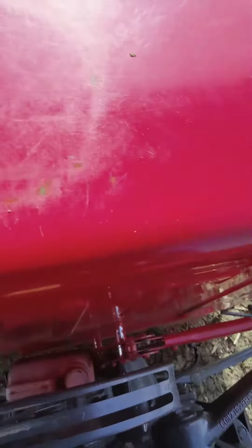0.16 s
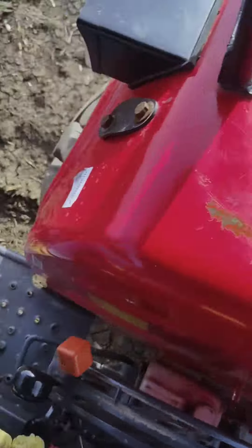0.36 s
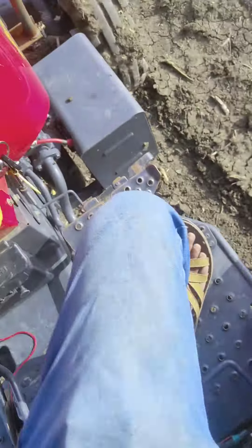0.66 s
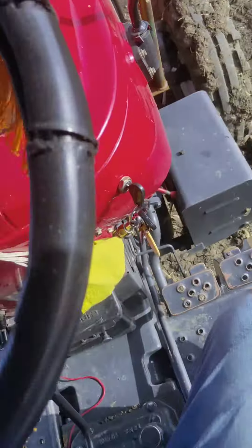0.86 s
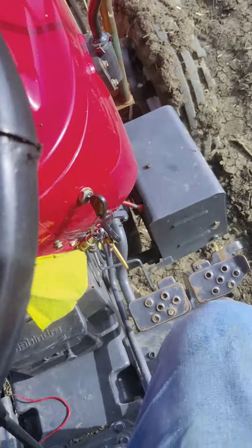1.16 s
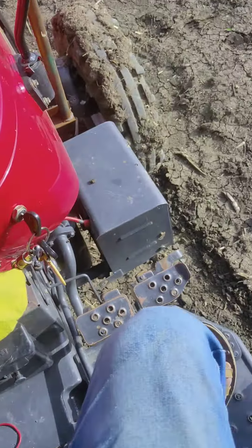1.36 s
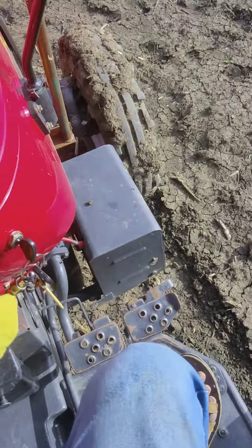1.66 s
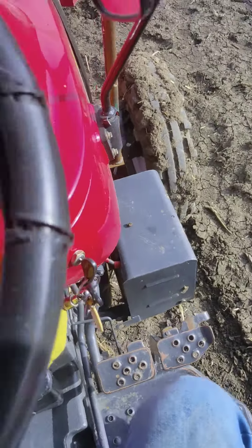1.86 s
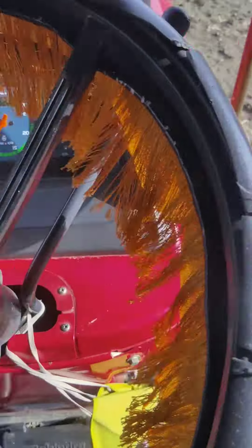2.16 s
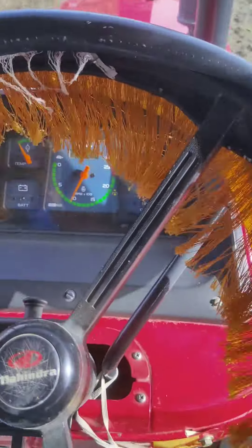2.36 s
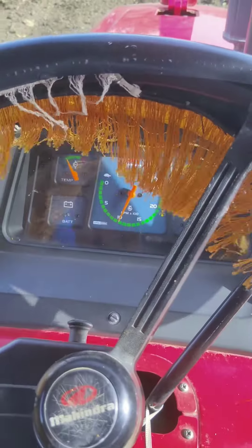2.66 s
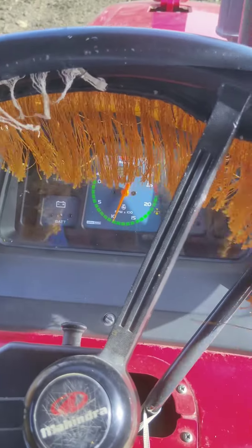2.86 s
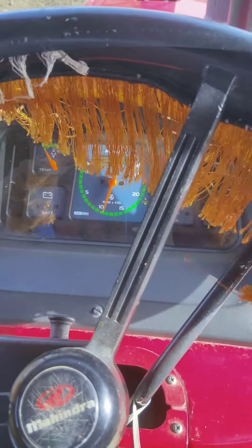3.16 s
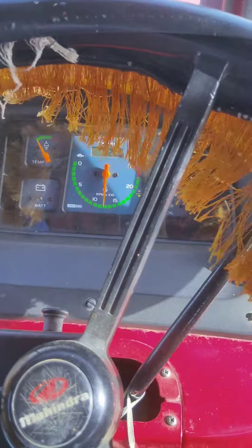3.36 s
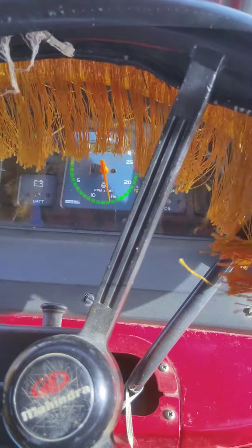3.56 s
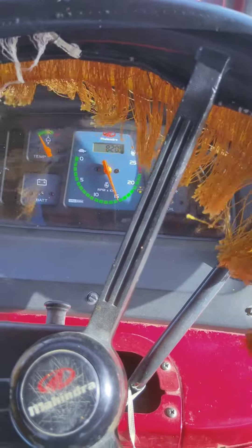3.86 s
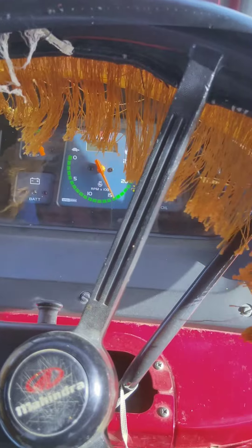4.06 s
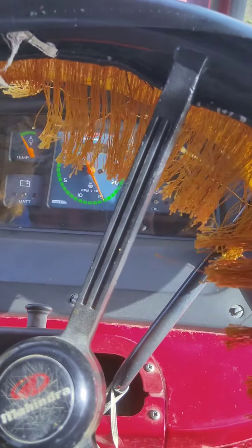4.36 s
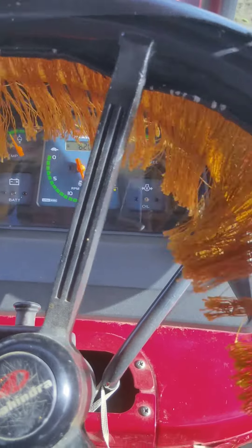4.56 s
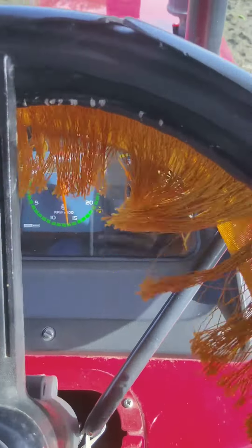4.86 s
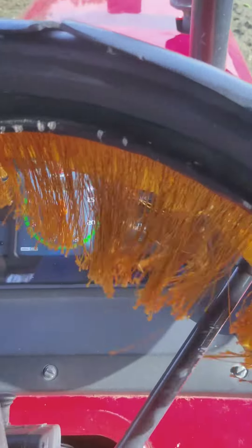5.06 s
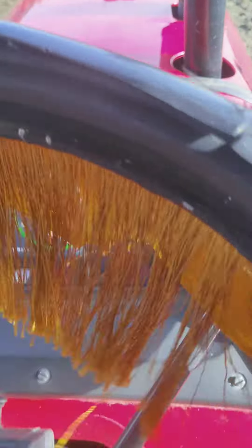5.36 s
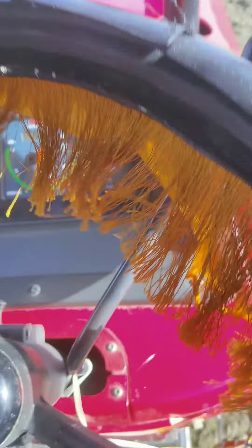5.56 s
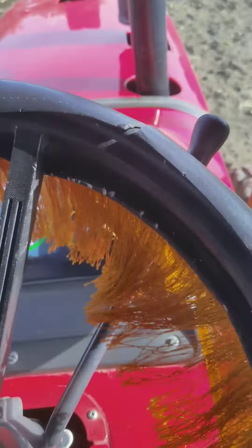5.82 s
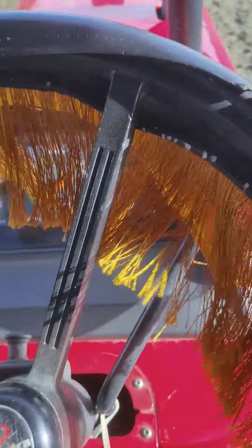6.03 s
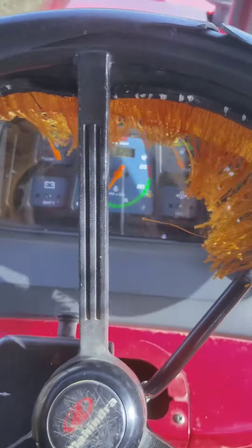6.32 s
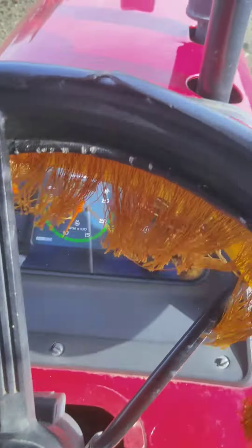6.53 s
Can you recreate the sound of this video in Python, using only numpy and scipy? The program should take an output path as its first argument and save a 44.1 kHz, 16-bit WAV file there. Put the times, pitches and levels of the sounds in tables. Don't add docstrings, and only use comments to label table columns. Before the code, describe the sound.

A four-cylinder diesel tractor idles with lumpy knocking, pulls away, revs to a loud hum, drops back, then labours with a gear whine.

```python
import sys
import numpy as np
from scipy import signal
from scipy.fft import rfft, irfft, next_fast_len
from scipy.io import wavfile
from scipy.ndimage import uniform_filter1d

SR = 44100
rng = np.random.default_rng(int(sys.argv[2]) if len(sys.argv) > 2 else 0)


def output_pcm(signal):
    pcm = np.clip(np.atleast_2d(signal).T, -1, 1) * 32767
    wavfile.write(sys.argv[1], SR, np.round(pcm).astype(np.int16))


def magnitude_from_level(level_db):
    exponent = np.asarray(level_db, float) / 20
    return 10 ** exponent


N = 295029

CYLINDERS = [1.5, 0.09, 2.1, 0]
# begins, done (time [s])
TURN_S = (2.05, 2.35)


def rms_one(x):
    return x / np.sqrt(np.mean(x ** 2) + 1e-20)


def ramp(times, values):
    return np.interp(np.arange(N) / SR, times, values)


def in_time(rows):
    return ramp(*np.transpose(rows))


def at_hz(points, hz):
    table_hz, values = np.transpose(points)
    return np.interp(np.log(hz), np.log(table_hz), values)


def swell(middle, half):
    return np.cos(np.pi / 2 * ramp([middle - half, middle + half], [-1, 1])) ** 2


def drift(rate):
    r = np.exp(-80 * np.pi * rate / SR)
    noise = rng.standard_normal(N // 40 + 2002)
    slow = signal.lfilter([1], [1, -2 * r, r * r], noise)[2000:]
    return np.interp(np.arange(N) / 40, np.arange(len(slow)), rms_one(slow))


def ring(impulses, hz, t60):
    r, w = magnitude_from_level(-60 / (t60 * SR)), 2 * np.pi * hz / SR
    return signal.lfilter([0, np.sin(w)], [1, -2 * r * np.cos(w), r * r], impulses + 1e-18)


def fade(x, seconds):
    r = np.exp(-1 / (seconds * SR))
    return signal.lfilter([1 - r], [1, -r], x)


def even(power):
    return np.sqrt(power / uniform_filter1d(power, size=SR // 6))


def band(spectrum, low_hz, high_hz):
    def gain(hz):
        edges = (1 + (low_hz / hz) ** 10) * (1 + (hz / high_hz) ** 10)
        return magnitude_from_level(at_hz(spectrum, hz)) / np.sqrt(edges)
    return gain


def ports(layers):
    # (frequency [Hz], share heard alike [0-1])
    likeness = [(50, 1), (120, 0.6), (240, 0.99), (500, 0.36), (1000, 0.36), (2000, 0.24), (4000, 0.11),
                (8000, 0.13)]
    lag_samples, lag_from_hz = 19, 950
    size = next_fast_len(N + 4096)
    hz = np.maximum(np.arange(size // 2 + 1) * SR / size, 1)
    alike = np.clip(at_hz(likeness, hz), 0, 1)
    late = np.exp(-2j * np.pi * hz * lag_samples / SR * (hz > lag_from_hz))
    arrival = np.array([late, np.ones_like(late)])
    out = 0
    for gate, gain in layers:
        shared, *own = rfft(gate * rng.standard_normal((3, N)), size)
        both = np.sqrt(alike) * shared * arrival + np.sqrt(1 - alike) * np.array(own)
        out = out + rms_one(gain(hz)) * both
    return irfft(out, size)[:, :N]


def firings(turn, spread_db, late=0.0):
    count = np.floor(turn - late).astype(int)
    at = np.flatnonzero(np.diff(count)) + 1
    chance_db = spread_db * rng.standard_normal(400)[count[at]]
    impulses = np.zeros(N)
    impulses[at] = magnitude_from_level(np.array(CYLINDERS)[count[at] % 4] + chance_db)
    return impulses


def knock(turn, spread_db, rise, fall):
    draws = rng.standard_normal((400, 2))
    count = np.floor(turn).astype(int)
    angle = np.clip(turn - count - .04 - .025 * draws[count, 0], 0, 1)
    size = magnitude_from_level(2 * (.25 * np.array(CYLINDERS)[count % 4] + spread_db * draws[count, 1]))
    pulse = size * (1 - np.exp(-(angle / rise) ** 2)) * np.exp(-(angle / fall) ** 1.19)
    return fade(pulse, .0013) / np.mean(pulse)


def exhaust(turn, rate, lugging):
    # (time [s], level [dB])
    blast = [(0.0, -54.9), (0.85, -52.4), (1.08, -38.5), (1.26, -48.7), (1.4, -38.3), (2.3, -33.5),
             (3.0, -31.9), (3.3, -22.9), (4.05, -24.7), (4.085, -38.6), (4.2, -27.6), (4.6, -38.1),
             (4.84, -36.6), (4.865, -27.0), (5.2, -27.6), (5.55, -37.2), (5.85, -31.1), (6.69, -29.2)]
    # (frequency [Hz], level [dB])
    pipe = [(40, -10.8), (70, 4.1), (90, 9.7), (108, 13.8), (135, 2.8), (160, 0.5), (200, -6.0),
            (330, -11.9)]
    # (multiple of the firing rate, running free [dB], lugging [dB])
    orders = [(2, -5.9, -3.8), (3, -1.6, -3.4), (4, 3.5, -8.5), (5, 0.5, 8.6), (6, 4.5, 8.4)]
    blast_db = in_time(blast)
    levels = []
    for k, free_db, lug_db in orders:
        shape_db = free_db + (lug_db - free_db) * lugging
        levels.append(blast_db + at_hz(pipe, k * rate) + shape_db)
    fundamental_db = np.maximum(levels[0] - 1.0, levels[1]) - 22
    apart = np.array([[.15], [-.15]])
    note = 0
    for k, level_db in enumerate([fundamental_db] + levels, 1):
        phase = 2 * np.pi * k * (turn - .1) + .5 * k * k + .035 * k * drift(7) + apart
        note = note + np.sqrt(2) * magnitude_from_level(level_db + .4 * drift(6)) * np.cos(phase)
    return note


def evened(x):
    return x / np.sqrt(uniform_filter1d(x ** 2, size=SR // 5) + 1e-9)


def rumble(turn, low_db, high_db, steady_db):
    # (frequency [Hz], level [dB per Hz])
    rumble_colour = [(15, -71), (25, -43.5), (70, -18.5), (81, -13.5), (108, -5), (162, -3.5), (195, -6),
                     (247, -4), (323, -8), (358, -8), (431, -7.5), (690, -9.5), (904, -15.5), (1120, -18.5),
                     (1400, -33), (1820, -67.5), (3080, -120)]
    # (frequency [Hz], level [dB], t60 [s])
    panels = [(158, -4.5, 0.045), (245, -10, 0.099), (317.8, 2, 0.2), (353.7, 3, 0.17), (386.1, -0.5, 0.22),
              (486.3, 1, 0.22), (550, -6, 0.35), (606.8, 7, 0.14), (716, -9, 0.038), (839, 0.5, 0.099),
              (1075, -12, .08)]
    jolts = .55 * (rng.random((2, N)) < 60 / SR) * rng.standard_normal((2, N))
    struck = []
    for k, (hz, db, t60) in enumerate(panels):
        blows = firings(turn, 2.5, late=1.03 * k) + jolts[k % 2]
        struck.append(magnitude_from_level(db) * ring(blows, hz, t60) * (-1) ** k)
    sides = magnitude_from_level(3.45 * np.array([[-1], [1]]) * (-1) ** np.arange(len(panels)))
    low = magnitude_from_level(low_db - 5) * evened(sides[:, :5] @ struck[:5])
    high = magnitude_from_level(high_db - 4.5) * evened(sides[:, 5:] @ struck[5:])
    no_bass = signal.butter(3, 110, "high", fs=SR, output="sos")
    radiated = magnitude_from_level(1.5) * signal.sosfilt(no_bass, low + high)
    throb = even(knock(turn, 1.5, .08, .45) + magnitude_from_level(2 * steady_db + 6))
    low_noise = (magnitude_from_level(low_db + 1.5) * np.sqrt(throb), band(rumble_colour, 12, 407))
    high_noise = (magnitude_from_level(high_db + 1.5) * throb, band(rumble_colour, 440, 1300))
    return radiated + ports([low_noise, high_noise])


def block_rings(turn, block_db, top_db, steady_db):
    # (frequency [Hz], level [dB], t60 [s])
    block_modes = [(1540, -3, .04), (1780, 3, .04), (2150, -5, .03), (2700, -8, .025), (4700, -7, .01),
                   (6150, 0, .011), (6650, 0, .01), (7200, -3, .009)]
    blows = (rng.random((2, N)) < 1800 / SR) * rng.standard_normal((2, N))
    volley = knock(turn, 1.0, 0.062, 0.36) * blows
    rings = [magnitude_from_level(db) * ring(volley, hz, t60) for hz, db, t60 in block_modes]
    clearer_db = ramp(TURN_S, [0, 3])
    block = magnitude_from_level(block_db - 3 + clearer_db) * rms_one(sum(rings[:4]))
    pipes = magnitude_from_level(top_db - 1) * rms_one(sum(rings[4:]))
    return (block + pipes) / np.sqrt(1 + magnitude_from_level(2 * steady_db))


def clatter(turn, block_db, top_db, steady_db):
    # (frequency [Hz], level [dB per Hz])
    beside = [(530, -31.5), (900, 9), (1080, 4.5), (1370, -4), (1530, -3), (1940, -5.5), (2270, -9.5),
              (2610, -14.5), (3660, -17.5), (3870, -20.5), (6530, -13.5), (7650, -15.5), (7870, -21.5),
              (8400, -36), (10900, -68), (18500, -120)]
    # (frequency [Hz], level [dB per Hz])
    ahead = [(530, -21.5), (900, 2.5), (1370, -16), (1730, -13), (2070, -15), (2660, -17.5), (3560, -21.5),
             (4090, -19.5), (5360, -17), (6590, -8.5), (7170, -15), (7580, -12), (7940, -28.5), (8400, -53),
             (10900, -67), (18500, -120)]
    ticks = (rng.random(N) < 250 / SR) * magnitude_from_level(2.0 * np.minimum(rng.exponential(1, N), 4))
    steady = magnitude_from_level(2 * steady_db) + 0.027 * fade(ticks, 0.0014) / np.mean(ticks)
    shock = knock(turn, .7, .045, .3)
    facing = ramp(TURN_S, [0, np.pi / 2])
    bands = [(1076, 4230, block_db + 5.5), (2700, 4960, block_db - 1.5), (4850, 22000, top_db + 2.5)]
    layers = []
    for low_hz, high_hz, level_db in bands:
        gate = magnitude_from_level(level_db) * even(shock * magnitude_from_level(1.6 * drift(40)) + steady)
        layers.append((gate * np.cos(facing), band(beside, low_hz, high_hz)))
        layers.append((gate * np.sin(facing), band(ahead, low_hz, high_hz)))
    return ports(layers) + block_rings(turn, block_db, top_db, steady_db)


def clicks():
    # (time [s], peak level [dB])
    loose_parts = [
        (1.9335, -16),
        (5.7061, -6.5),
    ]
    hits = np.zeros(N)
    for s, db in loose_parts:
        hits[round(s * SR)] = magnitude_from_level(db)
    burst = fade(hits, 0.0056) * 0.0072 * SR * rng.standard_normal((2, N))
    bright = signal.butter(2, [4800, 8000], "band", fs=SR, output="sos")
    return magnitude_from_level(-5.5) * signal.sosfilt(bright, burst)


def gears(turn):
    # (middle [s], half length [s], teeth per firing [count], level [dB rms])
    mesh_swells = [(5.5, .2, 10, -33), (5.5, .2, 14, -34), (5.95, .3, 10, -32), (6.0, .19, 14, -24),
                   (6.3, .12, 10, -26), (6.3, .1, 14, -28), (6.56, .2, 10, -25), (6.52, .14, 14, -30)]
    out = 0
    for teeth in (10, 14):
        level = sum(magnitude_from_level(db) * swell(s, half) ** .5 for s, half, count, db in mesh_swells if count == teeth)
        tone = np.sin(2 * np.pi * teeth * turn + .4 * drift(9))
        out = out + np.sqrt(2) * level * magnitude_from_level(1.5 * drift(12)) * tone
    return out


def scene():
    # (time [s], rate [firings per s])
    speed = [(0.0, 19.84), (0.908, 20.25), (1.133, 26.42), (1.307, 26.89), (1.954, 31.48), (2.276, 35.01),
             (3.026, 36.26), (3.131, 39.35), (3.381, 55.84), (4.106, 54.06), (4.493, 45.33), (4.853, 39.47),
             (5.16, 40.27), (5.497, 25.13), (5.855, 30.03), (6.209, 31.76), (6.466, 36.44), (6.69, 39.49)]
    # (time [s], level [dB])
    injected = [(0, -51), (.76, -50), (.88, -45), (.98, -48), (1.06, -39), (1.13, -42.5), (1.2, -47),
                (1.4, -43.5), (2.0, -42), (3.02, -41.5), (3.16, -30), (3.35, -30), (3.45, -35.5),
                (4.25, -33.5), (4.83, -44.5), (4.87, -30), (5.55, -35.5), (6.69, -33)]
    # (time [s], level [dB])
    shaking = [(0, -31), (.5, -30), (.62, -31.5), (.85, -33), (1.06, -25), (1.2, -28), (1.28, -28.5),
               (2.25, -25), (3.05, -24.5), (3.22, -21), (3.9, -18), (4.31, -18.5), (4.42, -23), (4.83, -23),
               (5.25, -20), (5.7, -23.5), (6.69, -21)]
    # begins, full, eases, over (time [s])
    lugging_s = (5.2, 5.32, 6.4, 6.6)
    rate = in_time(speed)
    turn = np.cumsum(rate) / SR + .215
    lugging = ramp(lugging_s, [0, 1, 1, 0])
    fuel_db, shake_db = in_time(injected), in_time(shaking)
    fuel, shake = fuel_db + 40, shake_db + 23
    block_db = -43.5 + .66 * fuel + 2 * ramp(TURN_S, [1, 0])
    high_db = -29.5 + .51 * shake + .2 * fuel + 1 * lugging + 1 * swell(5.9, .18)
    top_db = fuel_db + 2.5 * swell(5.71, .09)
    steady_db = np.minimum(-2.5 + 19 * np.log2(rate / 35) - .65 * fuel, 3)
    fired = turn + .0028 * rate
    engine = rumble(fired, shake_db, high_db, steady_db) + clatter(fired, block_db, top_db, steady_db)
    return exhaust(turn, rate, lugging) + engine + clicks() + gears(turn)


def roll_off(x):
    return signal.sosfilt(signal.butter(12, 8560, fs=SR, output="sos"), x)


def record(dry):
    rounded = 1.2 * np.tanh(dry / 1.2)
    top_cut = signal.cheby2(12, 60, 8750, fs=SR, output="sos")
    return roll_off(signal.sosfilt(top_cut, rounded))


dry = scene()
out = record(dry)
output_pcm(out)
```